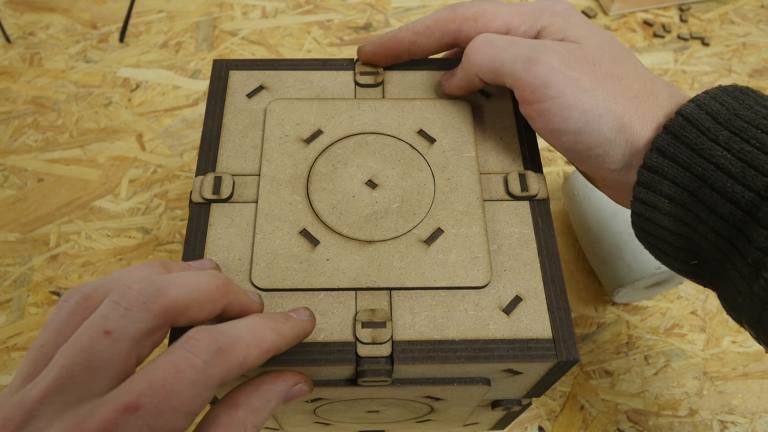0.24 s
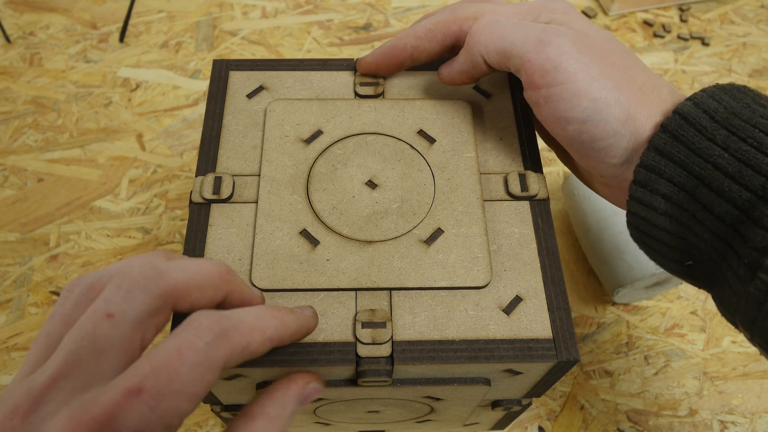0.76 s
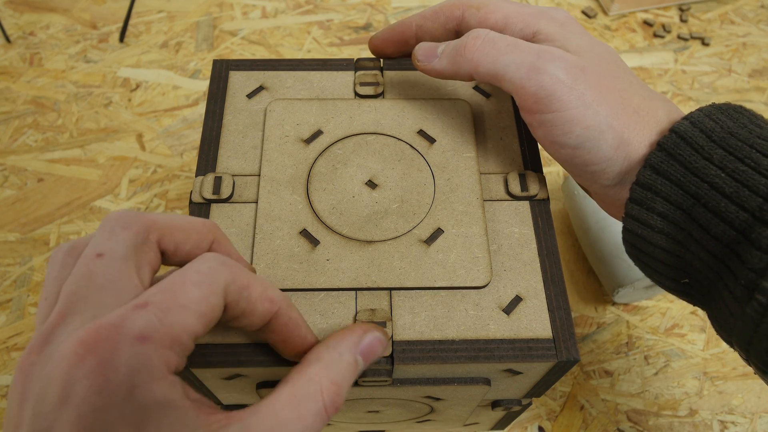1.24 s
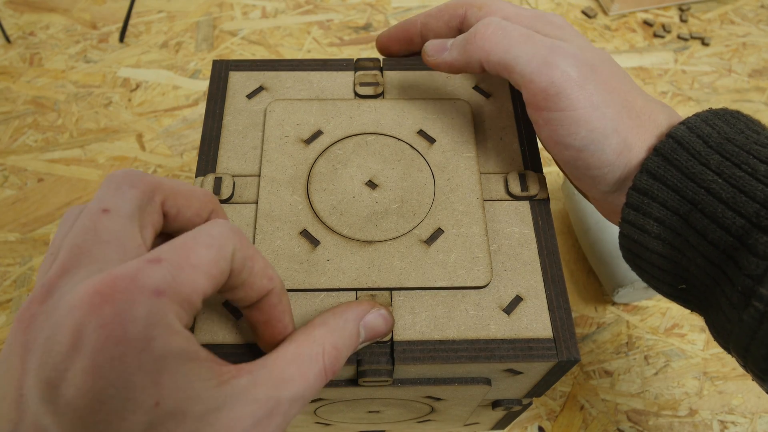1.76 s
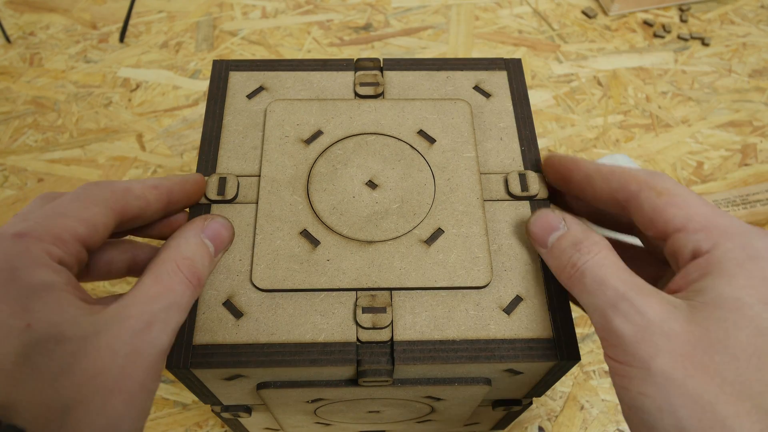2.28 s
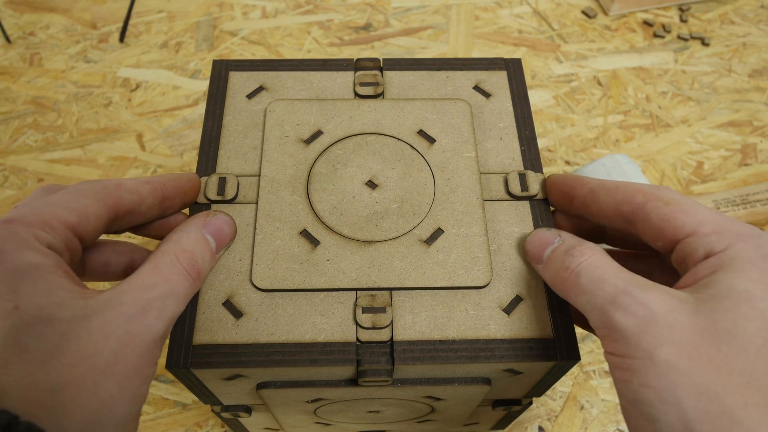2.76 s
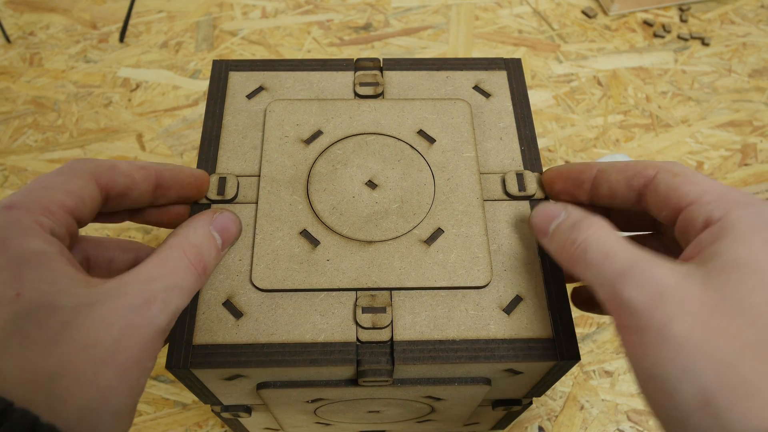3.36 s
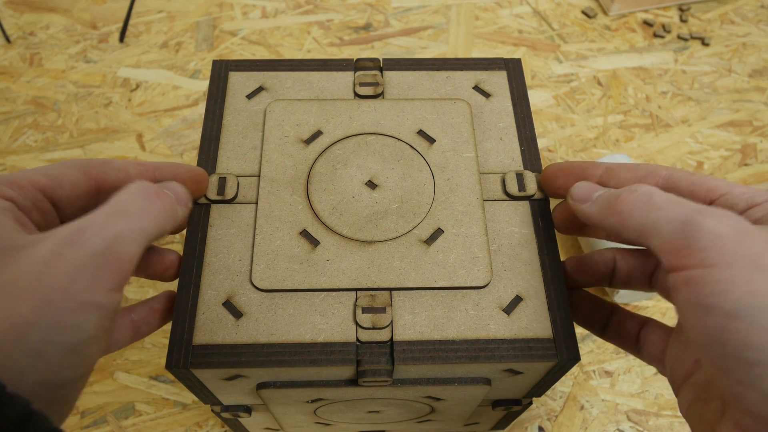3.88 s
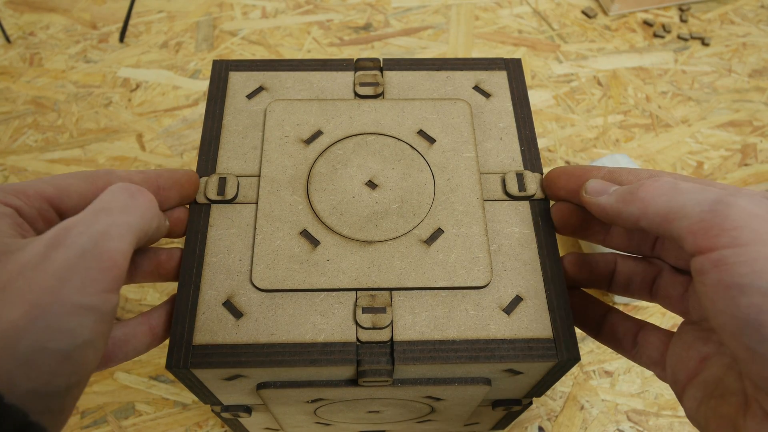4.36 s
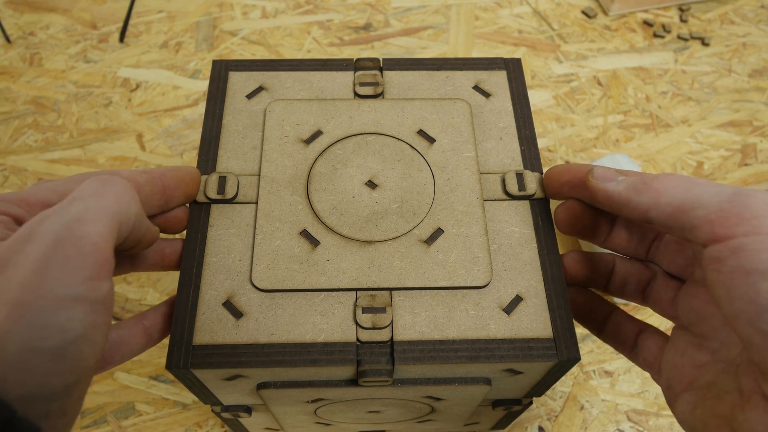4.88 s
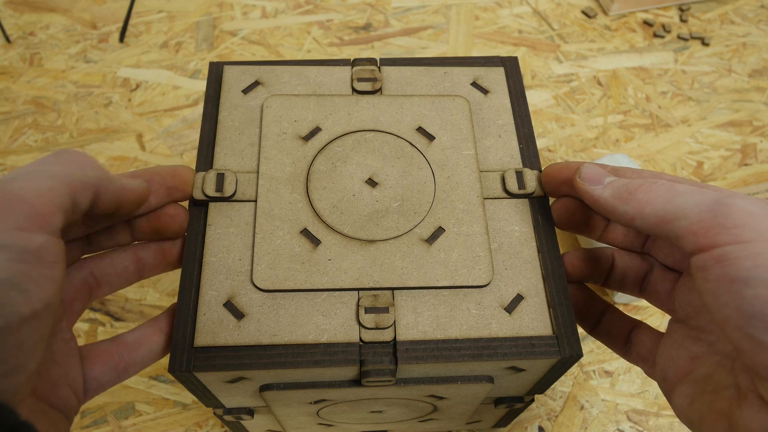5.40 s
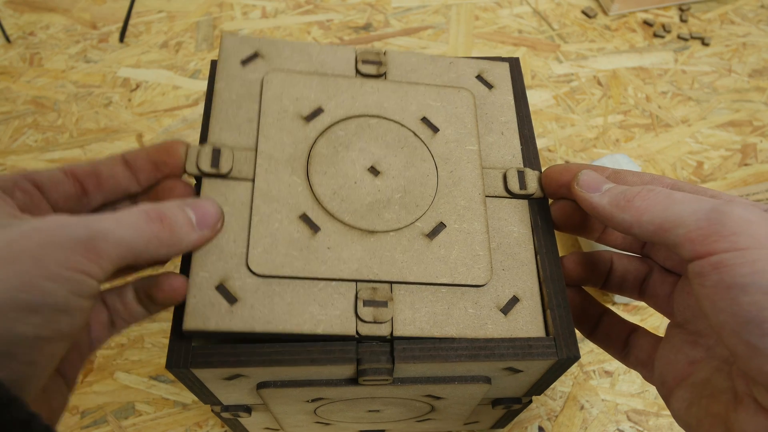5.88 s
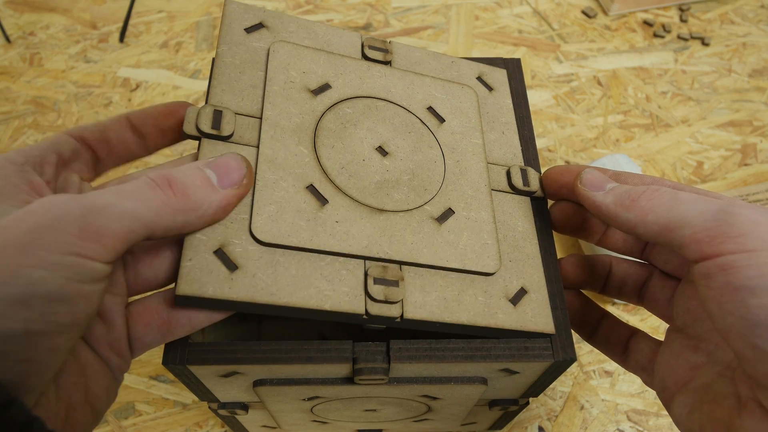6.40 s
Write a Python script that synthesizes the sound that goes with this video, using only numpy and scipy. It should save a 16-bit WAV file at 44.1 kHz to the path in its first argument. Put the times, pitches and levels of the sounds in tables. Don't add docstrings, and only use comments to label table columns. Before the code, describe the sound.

Hands work latches on a hollow fibreboard box: a sharp crack, small ticks and dull bumps, then a grating lid, with faint fan hum behind.

```python
import sys
import numpy as np
from scipy import signal
from scipy.fft import rfft, irfft, next_fast_len
from scipy.io import wavfile
from scipy.ndimage import uniform_filter1d

SR = 44100
rng = np.random.default_rng(int(sys.argv[2]) if len(sys.argv) > 2 else 0)


def gain_from_db(level_db):
    decades = np.asarray(level_db, float) / 20
    return 10 ** decades


def inscribe(sig):
    pcm = np.round(np.clip(np.atleast_2d(sig).T, -1, 1) * 32767)
    wavfile.write(sys.argv[1], SR, pcm.astype(np.int16))


N = 292824


def level(x, db):
    return x * gain_from_db(db) / np.sqrt(np.mean(x ** 2))


def band(x, hz, width_hz):
    return signal.lfilter(*signal.iirpeak(hz, hz / width_hz, SR), x)


def steep(x, hz, width_hz):
    return band(band(x, hz, width_hz), hz, width_hz)


def colour(points, peaks=()):
    size = next_fast_len(N)
    hz, db = np.transpose(points)
    f = np.maximum(np.fft.rfftfreq(size, 1 / SR), 1)
    shape_db = np.interp(np.log(f), np.log(hz), db, left=-90, right=-90)
    for centre, width, height_db in peaks:
        shape_db = shape_db + height_db / (1 + (2 * (f - centre) / width) ** 2)
    spectrum = rfft(rng.standard_normal(size)) * gain_from_db(shape_db)
    return irfft(spectrum, size)[:N]


def walk(rate):
    steps = rng.standard_normal(int(N / SR * 100) + 2)
    return 1.2 * np.interp(np.arange(N) * rate / SR, np.arange(len(steps)), steps)


def gain(strokes, column):
    stroke_db = 15
    t, power = np.arange(N) / SR, np.zeros(N)
    for row in strokes:
        s, rise, fall = row[0], max(row[1], .002), max(row[2], .002)
        span = slice(max(int((s - 3 * rise) * SR), 0), int((s + 3 * fall) * SR))
        away = np.maximum((s - t[span]) / rise, (t[span] - s) / fall)
        power[span] += gain_from_db(row[column] - stroke_db * away) ** 2
    return np.sqrt(power)


def ring(hz, t60, rise_s, size):
    t = np.arange(size) / SR
    decay = np.exp(-np.log(1000) * t / np.clip(t60, .003, .25))
    return (1 - np.exp(-t / rise_s)) * decay * np.sin(2 * np.pi * hz * t)


def add(out, s, x):
    i = int(s * SR)
    out[i:i + len(x)] += x[:N - i]


def contacts(table, crack_db, late_s, crack_per_db=0):
    latch_t60_s, crack_per_hardness = 0.0088, 0.84
    out, t = np.zeros(N), np.arange(2048) / SR
    for s, db, low_hz, high_hz, hard_db in table:
        noise = rng.standard_normal((2, len(t)))
        low = ring(low_hz, latch_t60_s, 0.000237, size=len(t))
        high = ring(high_hz, 0.523 * latch_t60_s, 0.000123, size=len(t))
        latch = low + gain_from_db(hard_db + 7.5) * high
        panel = gain_from_db(-6.5) * steep(noise[0] * np.exp(-t / 0.007), 1.135 * low_hz, 2085)
        crack = steep(noise[1] * np.exp(-t / 0.000421), 5930, 4840)
        this_crack_db = crack_db + crack_per_hardness * hard_db + crack_per_db * (db + 8) + 11
        add(out, s + late_s, gain_from_db(db) * (gain_from_db(-0.5) * (latch + panel) + gain_from_db(this_crack_db) * crack))
    return out


def friction(strokes, hiss_spectrum, board_modes, grit_db):
    slips = gain_from_db(2.0 * walk(90))
    hiss = level(colour(hiss_spectrum), -2.73)
    grains_db = grit_db * rng.exponential(size=N // 16 + 1).repeat(16)[:N]
    push = rng.standard_normal(N) * gain_from_db(grains_db)
    board = level(sum(gain_from_db(db) * steep(push, hz, w) for hz, w, db in board_modes), -0.49)
    return slips * (hiss * gain(strokes, column=3) + board * gain(strokes, column=4))


# (frequency [Hz], density [dB per Hz])
FAN_AIR = [(30, -44.5), (60, -12), (230, -13.5), (290, -15.5), (600, -20.5), (1250, -21.5), (1700, -23.5),
           (2300, -23.5), (3500, -26), (4650, -31.5), (5400, -30.5), (7200, -41.5), (9500, -41.5),
           (16000, -49)]
# (frequency [Hz], width [Hz], level over the air [dB])
HOUSING_MODES = [(779.4, 25, 7.5), (1240, 15.7, 7.5), (1395.3, 10.4, 8), (1790.4, 13.3, 13),
                 (2016.5, 13.8, 14), (2220, 61.7, 10), (2401.6, 35.4, 9), (2586.2, 31.3, 11),
                 (2920, 33.5, 8.5), (3166, 16.5, 11.5), (3410, 32, 9), (3550, 20.7, 13.5), (3771, 99, 5.5),
                 (5290, 224, 1.5)]
# (frequency [Hz], level [dB rms])
HUM_LINES = [(41.7, -64.5), (50, -56.5), (70.9, -69), (100, -68), (103.9, -79), (150.1, -63), (207.7, -63),
             (311.5, -74), (415.4, -70), (528, -78.5)]


def fan():
    t = np.arange(N) / SR
    air = level(colour(FAN_AIR, HOUSING_MODES), -52.5)
    hum = np.zeros(N)
    for hz, db in HUM_LINES:
        waver_db = 0.586 * walk(3.446)
        hum += gain_from_db(db + 4.5 + waver_db) * np.sin(2 * np.pi * (hz * t + rng.random()))
    return air * gain_from_db(0.058 * walk(5.52)) + hum


# (time [s], peak [dB], low ring [Hz], high ring [Hz], hardness [dB])
PIN_CONTACTS = [(0.127, -34, 1096, 3550, -31.5), (0.849, -42, 1100, 3700, -6), (0.929, -49, 1770, 2590, -2),
                (1.132, -31.5, 1100, 2220, -9.5), (1.56, -31, 1007, 2250, -19.5),
                (1.862, -32, 1484, 2220, -4.5), (2.949, -28.5, 1796, 3400, -11),
                (2.961, -35, 1250, 2700, 0.5), (3.295, -32.5, 1220, 2860, -16),
                (3.943, -31, 1810, 3135, -5), (3.947, -30.5, 943, 2110, -2.5), (4.079, -32, 888, 2120, -21),
                (4.942, -39, 800, 2160, -22)]


def pins():
    return contacts(PIN_CONTACTS, crack_db=-16, late_s=0.00065)


# (time [s], peak [dB], frequency [Hz], decay t60 [s])
BOX_KNOCKS = [(0.127, -25, 234.8, 0.0886), (0.492, -23.5, 159.1, 0.076), (0.5, -16.5, 114.1, 0.073),
              (0.515, -22.5, 121, 0.046), (0.538, -20.5, 80.2, 0.052), (0.832, -39.5, 88, 0.074),
              (1.134, -37, 231.2, 0.115), (1.478, -42, 224, 0.086), (1.56, -46.5, 125, 0.053),
              (1.618, -40.5, 105.5, 0.116), (2.115, -36.5, 104, 0.099), (2.271, -33, 120, 0.027),
              (2.943, -37.5, 240, 0.148), (3.296, -40, 255.7, 0.192), (3.307, -49, 237, 0.04),
              (3.361, -42.5, 116, 0.063), (3.57, -34.5, 107, 0.067), (3.813, -40, 129.2, 0.117),
              (3.945, -30.5, 121, 0.119), (4.121, -37.5, 131, 0.099), (5.069, -33.5, 132.6, 0.055),
              (5.257, -36.5, 104.6, 0.142), (5.346, -21, 104.1, 0.034), (5.456, -26, 159, 0.0313),
              (5.531, -35.5, 99.6, 0.059), (5.579, -36.5, 148.5, 0.079), (5.76, -32.5, 234, 0.058),
              (5.8655, -20, 228, 0.04), (5.8699, -18, 235, .027),
              (.508, -29, 274, 0.068), (.128, -44, 700, 0.05), (1.135, -38, 550, 0.0286),
               (1.864, -46, 237.8, 0.19), (2.123, -31, 760, 0.0069), (2.277, -46, 540, 0.037),
               (3.2965, -35, 543, 0.042), (3.3, -36.5, 133.3, 0.16), (3.357, -36.5, 530, 0.022),
               (3.358, -32, 1000, 0.0112), (4.0805, -37, 1813, 0.0135), (6.2665, -36.5, 2440, 0.0082),
               (6.3445, -33.5, 1750, 0.0099), (3.95, -43, 509, 0.077), (3.953, -27.5, 239, 0.0298),
               (4.95, -43, 604, 0.0295), (5.3418, -29, 1580, 0.0194), (5.519, -35.5, 1684, 0.018),
               (5.075, -34, 219, 0.04), (5.921, -35, 330, 0.137), (6.194, -32.5, 186.5, 0.0866),
               (6.31, -38, 322, 0.155), (6.3439, -28, 5030, 0.004), (6.415, -44.5, 335, 0.18)]


def knocks():
    out = np.zeros(N)
    for s, db, hz, t60 in BOX_KNOCKS:
        box = ring(hz, t60, 0.329 / hz, size=8192)
        wall = ring(2.186 * hz, 0.184 * t60, 0.108 / hz, size=8192)
        add(out, s, gain_from_db(db + 1.0) * (box + gain_from_db(-12.5) * wall))
    return out


# (frequency [Hz], decay t60 [s], level [dB])
ROOM_BANDS = [(1100, 0.362, -27), (1900, 0.112, -44.5), (2700, 0.32, -33.5), (3920, 0.411, -31),
              (5800, 0.78, -37.5)]


def room(x):
    t = np.arange(SR // 3) / SR
    tail = np.zeros(len(t))
    for hz, t60, db in ROOM_BANDS:
        noise = steep(rng.standard_normal(len(t)), hz, 0.72 * hz)
        tail += gain_from_db(db - 28) * noise * np.exp(-np.log(1000) * t / t60)
    onset = 1 - np.exp(-t / 0.00127)
    return signal.oaconvolve(x, tail * onset)[:N]


# (time [s], peak [dB], frequency [Hz], decay t60 [s])
GRAINS = [(1.5028, -40, 1200, .006), (1.5407, -38, 972, .008), (5.455, -38, 1800, .006),
          (5.852, -33, 2810, .008), (5.858, -36, 1100, .01), (5.866, -36, 3300, .006),
          (5.872, -35, 2050, .015), (5.884, -38, 1500, .01), (5.917, -36, 3200, .008),
          (5.908, -38, 2150, .012), (6.318, -36, 1560, .01), (6.402, -40, 1170, .01),
          (6.17, -40, 1900, .012), (6.42, -40, 2800, .015), (5.897, -32, 330, .1), (6.3105, -29, 345, .1),
          (6.3437, -35, 6700, .004), (6.3437, -36, 3900, .004), (.128, -37, 1050, .012),
          (3.947, -38, 3250, .01), (5.9, -38, 150, .1), (6.172, -33, 400, .05), (5.3406, -23, 1150, .01),
          (.849, -44, 3700, .012), (5.62, -40, 150, .1), (5.68, -42, 150, .1), (5.87, -37, 42, .2)]


def grit():
    out = np.zeros(N)
    for s, db, hz, t60 in GRAINS:
        add(out, s, gain_from_db(db) * ring(hz, t60, .4 / hz, size=8192))
    return out


# (time of peak [s], rise [s], fall [s], fine
# hiss [dB], board scrape [dB])
FINGER_STROKES = [(.508, .007, .008, -46, -32), (.5205, .008, .003, -46, -30), (.53, .004, .02, -48, -38),
                  (.208, 0.086, 0.076, -67.5, -74.5), (1.51, 0.012, 0.039, -49, -44),
                  (1.557, 0.041, 0.009, -49, -42), (1.876, 0.0245, .008, -57, -48),
                  (1.916, 0.015, 0.052, -58.5, -52.5), (2.955, .012, .015, -51.5, -57),
                  (2.2, 0.2, 0.059, -62, -57), (2.266, 0.0128, 0.037, -63.5, -47),
                  (2.33, .03, 0.036, -67.5, -57.5), (2.5, 0.197, 0.051, -61.5, -58.5),
                  (2.54, 0.053, .02, -60, -63.5), (3.305, 0.0038, 0.0107, -73.5, -41.5),
                  (3.325, .02, 0.0295, -63, -50.5), (3.44, 0.047, 0.055, -65.5, -60.5),
                  (3.602, 0.013, 0.0172, -58.5, -49.5), (3.948, 0.0086, 0.0103, -59.5, -41.5),
                  (4.075, .02, .004, -66.5, -51.5), (4.15, 0.064, .02, -71.5, -55),
                  (4.944, .025, 0.074, -67.5, -53.5), (5.048, 0.048, .01, -77, -53.5)]
# (frequency [Hz], density [dB per Hz])
FINGER_HISS = [(2650, -23.5), (4500, -3), (5480, -10.5), (8830, -6.5), (14200, -14), (16000, -18.5)]
# (frequency [Hz], width [Hz], level [dB])
FINGER_BOARD = [(1614, 440, 4.5), (1156, 604, 4), (2012, 647, 6.5), (3002, 1248, 3.5), (4610, 2530, -16.5)]


def finger_rubs():
    return friction(FINGER_STROKES, FINGER_HISS, FINGER_BOARD, grit_db=1.76)


# (time of most load [s], rise [s], fall [s], boom [dB])
DRAGS = [(.588, 0.085, 0.025, -43.5), (.694, 0.126, 0.034, -49), (1.6, 0.053, 0.0105, -50.5),
         (2.29, 0.033, 0.032, -49.5), (2.97, 0.041, .04, -64.5), (3.35, 0.086, .04, -59),
         (4.562, 0.043, .06, -52), (4.7, 0.037, 0.0097, -50.5), (4.945, .04, .1, -59),
         (5.064, 0.078, 0.061, -50.5), (5.31, .1, .1, -58), (5.39, .1, 0.105, -50),
         (5.54, 0.108, 0.21, -48.5), (5.784, 0.0146, 0.071, -42), (5.868, 0.025, 0.143, -39.5),
         (5.99, .1, 0.062, -45), (6.175, 0.014, 0.052, -38), (6.208, 0.039, 0.27, -38),
         (6.306, .08, .3, -48), (6.53, 0.078, 0.12, -53.5)]


def bench():
    mode_hz, width_hz = 74.73, 9.1
    hz = mode_hz + width_hz * .3 * walk(13)
    boom = np.sqrt(2) * np.sin(2 * np.pi * np.cumsum(hz) / SR)
    return boom * gain(DRAGS, column=3)


SNAP_S = .5217
# (time [s], peak [dB], low ring [Hz], high ring [Hz], hardness [dB])
SNAP_CONTACTS = [(0.4945, -38, 850, 1700, -1.5), (0.5045, -27, 1900, 3300, -8.5),
                 (0.5088, -12, 1772, 3590, -9), (0.5105, -22, 1190, 2540, 9), (.5145, -28.5, 1490, 3020, 5),
                 (.5190, -27, 1500, 3330, 2.5), (SNAP_S, -8, 1100, 2720, 6),
                 (0.524, -28.5, 1270, 3100, -2.5), (0.529, -35.5, 1980, 3570, -3.5),
                 (.5328, -20.5, 927, 2430, -7), (0.5392, -27, 1660, 2900, -11.5)]


def snap():
    hits = contacts(SNAP_CONTACTS, crack_db=-18, late_s=.0002, crack_per_db=.9)
    floor = signal.butter(2, 650, "high", fs=SR, output="sos")
    return signal.sosfilt(floor, hits)


# (time [s], peak [dB], frequency [Hz], decay t60 [s])
BODY_MODES = [(.4935, -33, 1700, .015), (.4955, -34, 850, .02), (.5092, -16, 963, .014),
              (.5095, -14, 1700, .011), (.5095, -24, 1270, .012), (.5089, -22, 4300, .005),
              (.509, -19, 3300, .005), (.522, -25, 5080, .006), (.522, -29, 7600, .004),
              (.5219, -10, 1000, .014), (.5217, -2.5, 1665, .011), (.5219, -17, 1250, .012),
              (.5255, -22, 2900, .008), (.5262, -26, 1750, .01), (.5325, -31, 1000, .015),
              (.5398, -30, 1700, .015), (.5395, -32, 2650, .012)]


def latch_body():
    out, push_s = np.zeros(N), .0004
    for s, db, hz, t60 in BODY_MODES:
        add(out, s, -gain_from_db(db + 3) * ring(hz, t60, push_s, size=2048))
    return out


# (time of most shaking [s], rise [s], fall [s], rattle [dB], hollow [Hz])
SHAKES = [(0.521, 0.0065, 0.0218, -30, 256), (1.555, 0.059, 0.032, -40, 229),
          (2.278, 0.058, 0.051, -44.5, 220), (2.962, 0.0122, 0.0185, -43, 230),
          (3.304, 0.023, 0.121, -45.5, 228), (3.36, .05, 0.031, -50, 217), (4.53, .04, 0.037, -65.5, 226),
          (4.942, 0.029, 0.13, -51.5, 226), (5.064, 0.072, 0.03, -48.5, 207), (5.3, 0.052, 0.066, -39, 223),
          (5.458, 0.0173, 0.095, -48.5, 209), (5.552, 0.042, 0.088, -42.5, 231),
          (5.784, 0.082, 0.112, -42, 230), (5.868, 0.091, 0.083, -36, 219), (5.96, 0.098, 0.128, -46, 320),
          (6.17, 0.024, 0.06, -38, 314), (6.205, 0.039, 0.039, -44.5, 256),
          (6.306, 0.0286, 0.1025, -38.5, 297), (6.512, 0.0255, 0.042, -50.5, 227)]
# (frequency [Hz], width [Hz], level [dB])
CAVITY_MODES = [(131, 15.6, 3.5), (184.5, 85, -5.5), (240, 62, 0), (302.5, 11.1, -1.5), (345.2, 5.4, 2.5)]


def rattles():
    rows = np.array(SHAKES)
    open_hz = np.interp(np.arange(N) / SR, rows[:, 0], rows[:, 4])
    push = rng.standard_normal(N) * gain_from_db(1.47 * walk(60))
    cavity = np.zeros(N)
    for hz, w, db in CAVITY_MODES:
        cavity += gain_from_db(db) * band(push, hz, w) / (1 + ((hz - open_hz) / 70) ** 2)
    cavity /= np.sqrt(uniform_filter1d(cavity ** 2, SR // 8))
    return level(cavity, -1.96) * gain(SHAKES, column=3)


# (frequency [Hz], width [Hz], level [dB rms], decay t60 [s])
SCATTER_BANDS = [(1100, 900, -48, .35), (1700, 500, -48, .3), (2800, 1200, -44.5, .5), (3700, 700, -47, .5),
                 (6000, 3000, -53, .3)]


def scatter():
    t = np.maximum(np.arange(N) / SR - SNAP_S, 0)
    onset = 1 - np.exp(-t / .004)
    out = np.zeros(N)
    for hz, w, db, t60 in SCATTER_BANDS:
        noise = level(steep(rng.standard_normal(N), hz, w), db)
        out += noise * onset * np.exp(-np.log(1000) * t / t60)
    return out


# (frequency [Hz], level [dB], decay t60 [s])
EDGE_MODES = [(5420, -2, .005), (8000, 1, .003), (10150, -6, .004), (14300, -12, .004)]
# (time [s], peak [dB])
EDGE_BLOWS = [
    (5.3397, -33),
    (5.3478, -48),
    (5.5181, -44),
    (6.3435, -36),
    (6.509, -44),
    (.929, -58),
    (5.866, -46),
]


def lid_edge():
    tick = sum(gain_from_db(db) * ring(hz, t60, .0001, size=512) for hz, db, t60 in EDGE_MODES)
    out = np.zeros(N)
    for s, db in EDGE_BLOWS:
        add(out, s, gain_from_db(db) * tick)
    return out


# (time [s], length [s], frequency [Hz], level [dB
CHATTERS = [
    (1.515, 0.008, 2918, -47),
    (3.308, 0.0218, 3440, -47.5),
    (4.067, 0.013, 863, -50),
    (5.842, 0.036, 2824, -39),
    (5.91, 0.0182, 3107, -43.5),
    (3.305, 0.038, 13500, -69),
    (3.941, .009, 13500, -62),
    (4.125, 0.039, 14000, -72.5),
]


def squeaks():
    out = np.zeros(N)
    for s, length, hz, db in CHATTERS:
        noise = rng.standard_normal(4096)
        settled = level(steep(noise, hz, .1 * hz), db)
        burst = settled[-int(length * SR):]
        add(out, s, burst * np.sqrt(np.hanning(len(burst))))
    return out


# (time [s], peak [dB], low ring [Hz], high ring [Hz], hardness [dB])
PRESSED_CONTACTS = [
    (2.123, -30, 1580, 2570, -11.5),
    (2.275, -29, 1024, 3083, -2),
    (3.296, -24, 827, 2326, -4.5),
    (3.356, -28, 1900, 2700, -1),
    (5.5176, -24, 1118, 3200, -8.5),
]


def pressed_pins():
    return contacts(PRESSED_CONTACTS, crack_db=-23.5, late_s=.0007)


# (time of most pressure [s], rise [s], fall [s], fine hiss [dB], board scrape [dB])
LID_STROKES = [(5.265, 0.0117, 0.052, -72, -57), (5.306, 0.0504, 0.0344, -58, -45),
               (5.496, 0.023, 0.013, -78.5, -54), (5.55, 0.0106, 0.059, -73, -54),
               (5.577, 0.038, 0.017, -71, -48.5), (5.785, .008, .12, -65, -52.5),
               (5.86, 0.0633, 0.052, -47.5, -38.5), (5.885, .015, .02, -60, -43),
               (5.915, 0.06, 0.08, -56, -45.5), (5.82, .05, .03, -62, -48),
               (5.947, .06, 0.052, -53.5, -60.5), (6.13, 0.0355, .06, -56, -64.5),
               (6.17, 0.056, 0.1, -59.5, -49.5), (6.314, 0.0455, 0.058, -55, -47),
               (6.328, 0.029, 0.0062, -55, -53.5), (6.412, 0.02, 0.05, -57, -50)]
# (frequency [Hz], density [dB per Hz])
RIM_HISS = [(2650, -27), (4500, -2.5), (6250, -7.5), (7770, -4.5), (15100, -17.5), (16000, -28.5)]
# (frequency [Hz], width [Hz], level [dB])
LID_BOARD = [(1050, 600, 1), (1550, 600, 5), (2100, 650, 5), (2650, 800, 2), (3300, 1300, 2),
             (4800, 2530, -12)]


def lid_rubs():
    return friction(LID_STROKES, RIM_HISS, LID_BOARD, grit_db=2.6)


# (time [s], peak [dB], low ring [Hz], high ring [Hz], hardness [dB])
RIM_CONTACTS = [
    (5.261, -34, 1680, 2920, -21),
    (5.339, -19, 979, 3030, -6.5),
    (5.3472, -22, 1400, 3410, -26.5),
    (5.455, -34, 995, 2200, -14.5),
    (5.764, -35, 1100, 2550, -11.5),
    (6.265, -33.5, 1250, 2230, -23),
    (6.343, -27.5, 1240, 3096, -2.5),
    (6.509, -38.5, 1360, 2870, 0),
]


def lid_catches():
    return contacts(RIM_CONTACTS, crack_db=-18, late_s=0.00083)


def scene():
    hands = pins() + knocks() + grit() + finger_rubs() + bench()
    hands += snap() + latch_body() + rattles() + lid_edge() + squeaks()
    hands += pressed_pins() + lid_rubs() + lid_catches()
    return (hands + gain_from_db(5.0) * room(hands) + fan() + scatter())[None]


def roll_off(x):
    return signal.sosfilt(signal.butter(12, 16200, fs=SR, output="sos"), x)


def record(dry):
    mix = np.clip(dry, -1, 1)
    return roll_off(mix)


dry = scene()
out = record(dry)
inscribe(out)
```